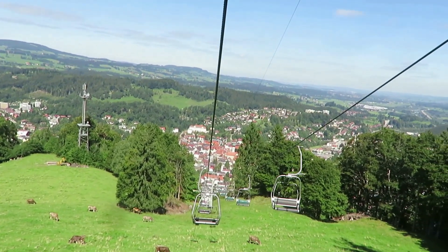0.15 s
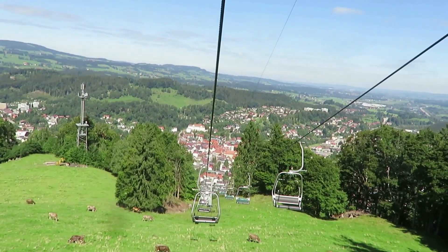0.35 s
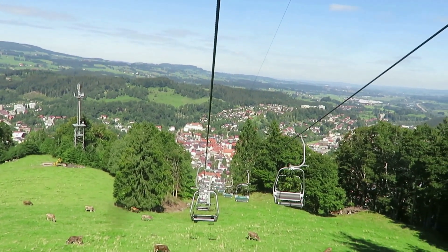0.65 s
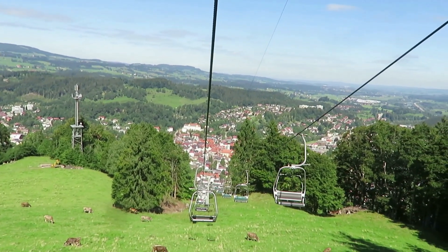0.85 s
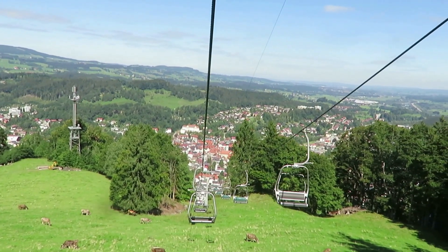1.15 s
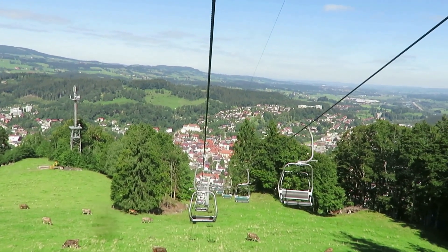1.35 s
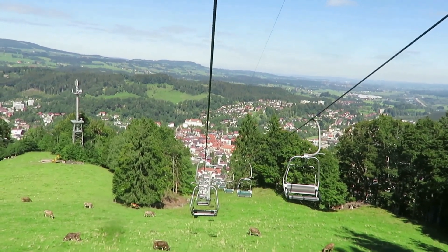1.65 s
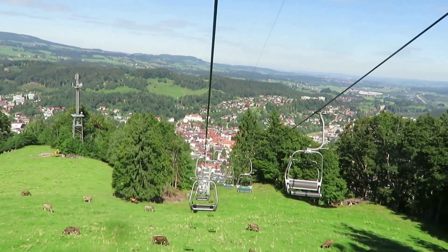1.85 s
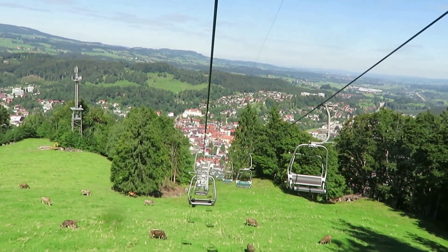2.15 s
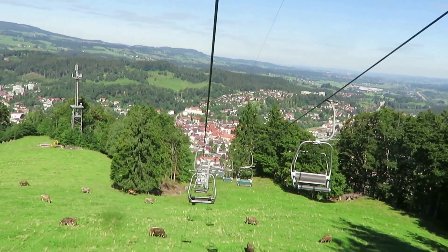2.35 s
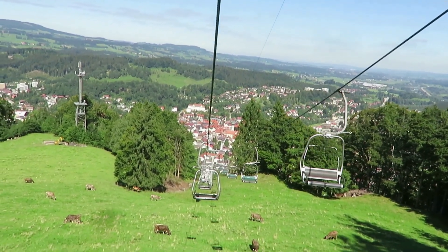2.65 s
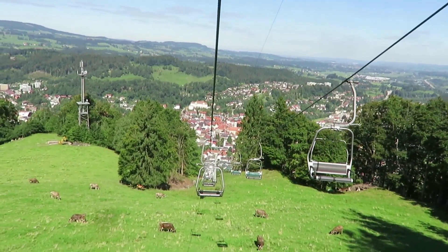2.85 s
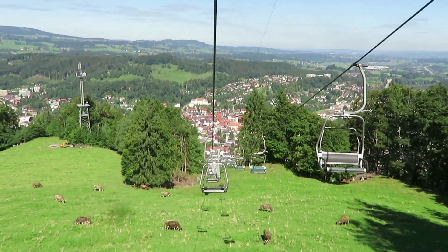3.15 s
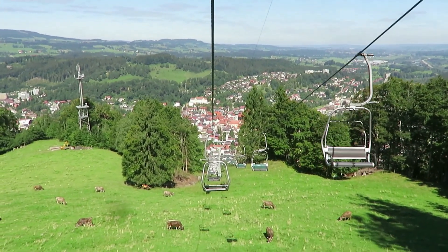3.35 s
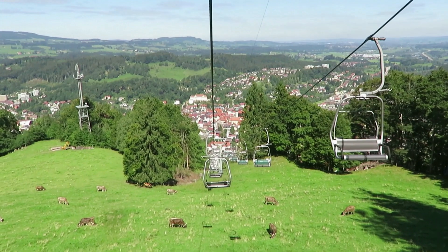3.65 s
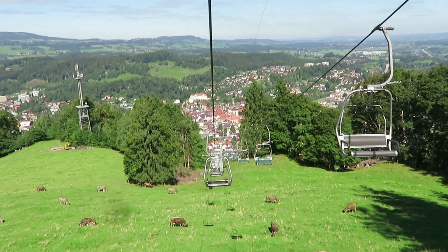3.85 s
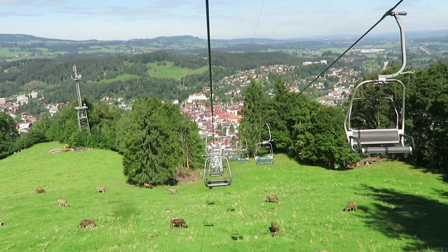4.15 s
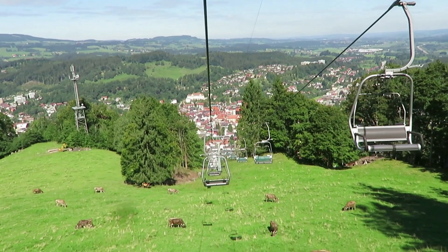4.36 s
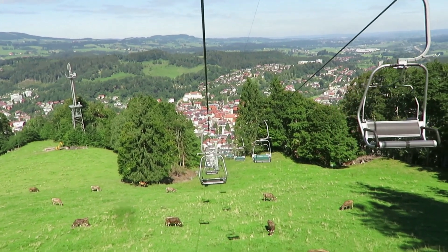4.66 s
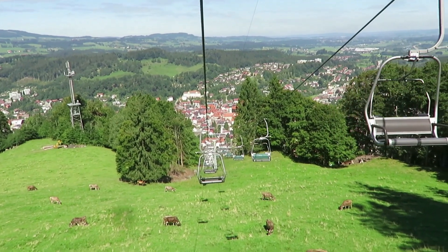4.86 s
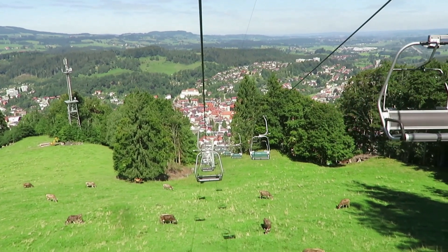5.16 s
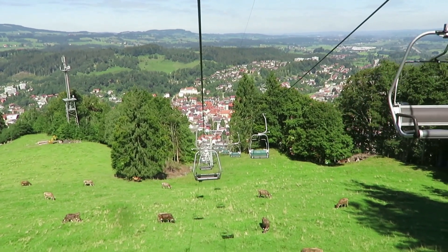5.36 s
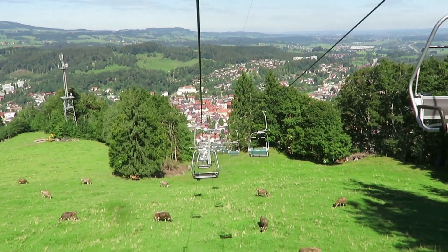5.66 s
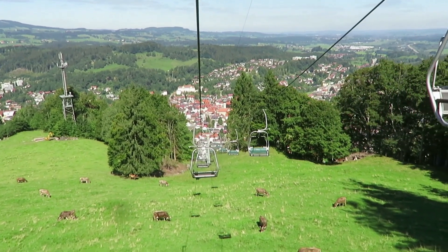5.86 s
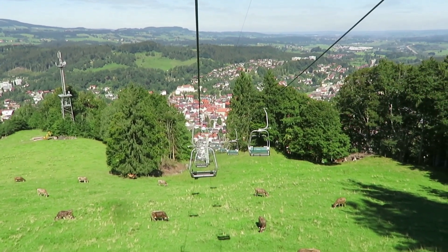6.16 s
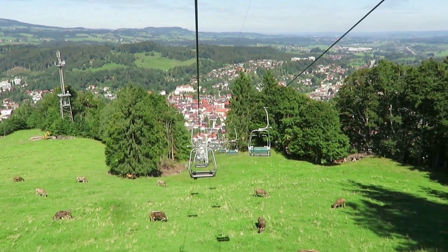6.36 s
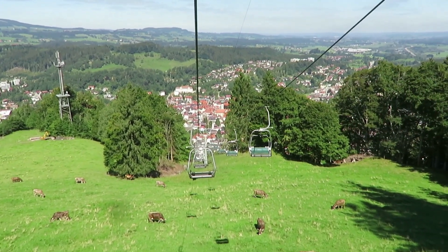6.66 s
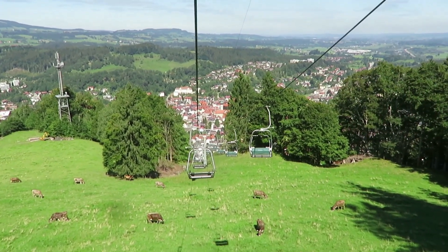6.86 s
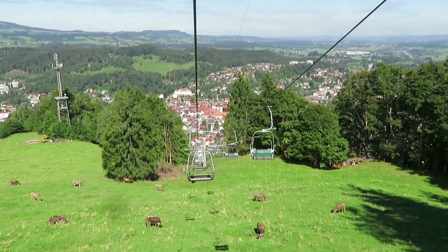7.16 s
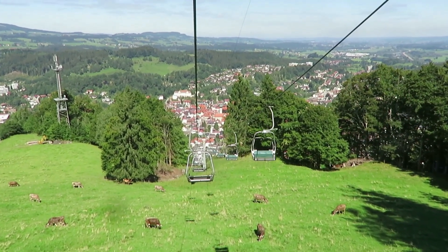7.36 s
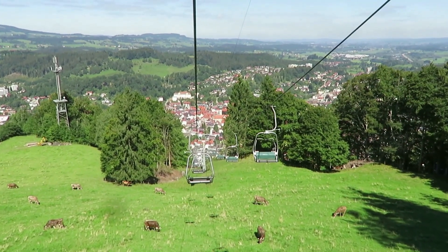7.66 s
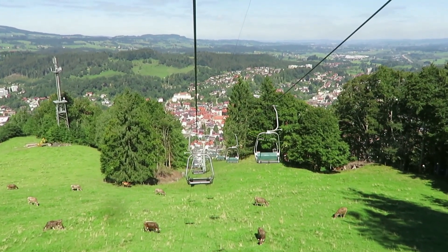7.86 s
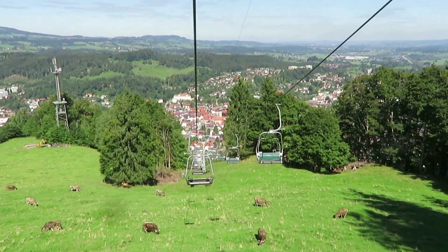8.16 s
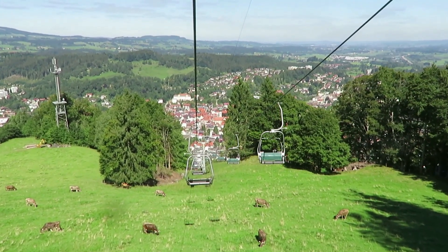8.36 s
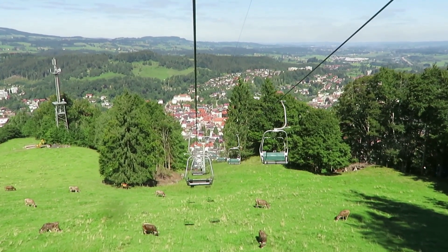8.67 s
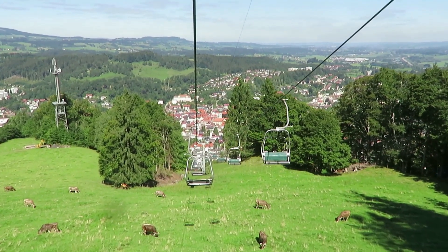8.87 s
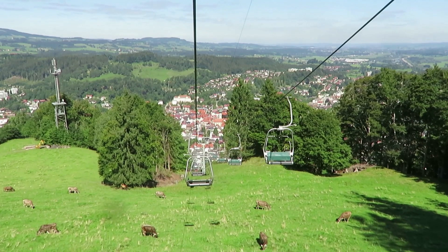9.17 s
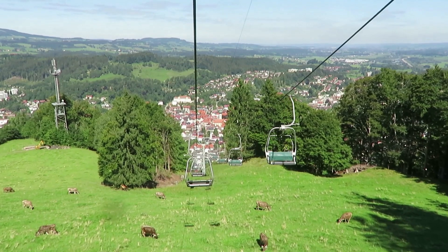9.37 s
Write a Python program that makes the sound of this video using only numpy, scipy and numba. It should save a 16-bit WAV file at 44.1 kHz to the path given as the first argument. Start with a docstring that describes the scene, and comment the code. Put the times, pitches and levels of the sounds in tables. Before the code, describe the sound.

A grazing herd's metal bells clatter in dense, irregular overlap, hollow clonks among bright rings, with distant tinkling and muffled wind buffeting.

```python
"""From the start, cattle graze on a mountain pasture, their bells clanking and jangling together.
Each near bell is a sum of damped modes set off at tabled times; a low air mode adds a hollow clonk.
Randomly struck bells tinkle further off over a noise haze, and a noise tail echoes from the forest edge.
Gusts of coloured noise rumble on the microphone, first briefly; a faint low drone fades throughout.
A tick of damped sines comes at 2.33 s, the longest gust at 4.6 s and shorter ones follow to the end."""
import sys
import numpy as np
from scipy import signal
from scipy.fft import rfft, irfft
from scipy.io import wavfile
from numba import njit

SR = 44100
rng = np.random.default_rng(int(sys.argv[2]) if len(sys.argv) > 2 else 0)


def materialize(psi):
    """Save the field psi as 16-bit PCM at rate SR to the path in sys.argv[1].

    A 1-D psi becomes a single channel; in a 2-D psi each row is a channel.
    """
    bounded = np.clip(np.atleast_2d(psi).T, -1, 1)
    quanta = np.round(bounded * 32767).astype(np.int16)
    wavfile.write(sys.argv[1], SR, quanta)


N = 419832

# vibration modes of each near bell: pitch_hz, level_db, t60_s
LEAD_MODES = [(380, -10, 0.3), (1308, -29.5, 0.88), (1836, -25, 0.71), (1955, -30.5, 0.95),
              (2330, -23.5, 0.25), (2408, -31, 2), (2476, -28.5, 0.5), (2780, -28, 0.34),
              (2843, -20.5, 0.41), (2995, -25, 0.45), (3170, -20.5, 0.13), (3290, -33, 1.5),
              (3360, -19, 0.11), (3446, -21, 0.13), (3560, -56, 1.4), (3750, -30, 0.29), (3900, -26, 0.42),
              (3895, -31.5, 0.43), (3840, -35, 1.4), (3910, -41, 1.9), (4120, -35, 0.23), (3960, -39, 1.7),
              (4600, -28, 0.39), (4750, -36, 0.5), (4480, -49, 1.61), (4830, -33, 0.32), (5260, -35, 0.61),
              (5460, -39, 0.27), (5440, -47, 0.1), (6540, -48, 0.33)]
DEEP_MODES = [(433.5, -15, 0.44), (1212, -23, 0.79), (1896, -33.5, 2.5), (1963, -25, 0.51),
              (2116, -33.5, 2.3), (2690, -19.5, 0.23), (2970, -27.5, 0.83), (3010, -36, 0.96),
              (3620, -36, 0.56), (3600, -47, 1.51), (3870, -27.5, 0.12), (4100, -27, 0.4),
              (4330, -38, 1.94), (4316, -42, 2.1), (4520, -34.5, 0.43), (4800, -32, 0.11),
              (4800, -25.5, 0.16), (4800, -40, 0.53), (5200, -45, 0.78), (5320, -36, 0.18),
              (5630, -45, 0.5), (5800, -31, 0.66), (6070, -41, 0.54), (6270, -46, 0.58), (6200, -42, 0.25)]
CLEAR_MODES = [(442.4, -19.5, 0.35), (1239, -26, 0.53), (1976, -23, 0.75), (2365, -32.5, 4.2),
               (2725, -27.5, 0.57), (2946, -20, 1.05), (3436, -36, 2.7), (3600, -38, 0.18),
               (3900, -24.5, 0.29), (4080, -44, 0.29), (4200, -30, 0.19), (4220, -19, 0.26),
               (4200, -44, 1.9), (4530, -42, 0.32), (4530, -28, 0.18), (4600, -43, 0.19), (4950, -29, 0.18),
               (5220, -33, 0.3), (6100, -31, 0.14), (6400, -30, 0.074)]
SHARP_MODES = [(810, -39, 1.5), (1340, -44, 7.1), (1502, -42, 5.6), (1806, -40.5, 2.9), (1880, -33, 0.91),
               (2420, -36.5, 6.3), (2700, -46, 1.8), (2844, -23, 0.41), (3060, -28.5, 0.85),
               (3180, -37, 3.2), (3440, -29, 0.54), (3465, -25.5, 0.29), (3850, -41, 0.58),
               (3770, -45, 0.25), (4300, -22, 0.21), (4850, -38.5, 0.37)]
BIG_MODES = [(316.3, -24.5, 0.76), (828, -41, 2.5), (1514, -33.5, 1.5), (2000, -44, 2.8), (2240, -44, 0.51),
             (2310, -29, 1.4), (3140, -30, 0.34), (3270, -27.5, 0.26), (3343, -19, 0.39), (3780, -30, 1.3),
             (3970, -31, 0.86), (4080, -26.5, 0.49), (4150, -26.5, 0.38), (4320, -34, 0.74),
             (4800, -31.5, 0.29), (5210, -41, 1.6)]
TINNY_MODES = [(446, -27, 0.6), (1967, -34, 2), (3200, -40, 0.6), (3330, -45, 2.1), (3700, -50, 1.8),
               (3750, -33, 0.57), (4280, -41, 0.45), (4320, -30, 0.55), (4210, -35, 0.26), (4430, -31, 0.3),
               (4560, -27, 0.12), (5270, -24.5, 0.2), (5810, -40, 0.37), (5880, -32, 0.28),
               (7970, -40.5, 0.45)]
DRY_MODES = [(832, -25.5, 0.29), (1952, -35, 2.8), (2172, -34, 0.66), (2320, -40, 0.12), (2386, -38, 2.6),
             (2530, -35, 2.3), (3080, -45, 0.51), (3200, -35, 0.57), (3490, -39.5, 1.1), (3690, -42, 1.8),
             (4000, -44, 2.5), (4700, -32, 0.23), (5080, -53, 0.4), (6380, -27.5, 0.1), (6560, -41, 0.15),
             (8230, -40, 0.4)]
BRIGHT_MODES = [(461, -27.0, 0.46), (1417, -34.5, 10.4), (1461, -43.5, 22), (1678, -41, 9.5),
                (2099, -39.5, 7.6), (2510, -25.5, 1.2), (2640, -32, 0.19), (2850, -27, 0.55),
                (3325, -36, 1.8), (3380, -34, 0.62), (3550, -32, 1.15), (4040, -40, 0.5), (4315, -22, 0.68),
                (4460, -33, 0.29), (6420, -23, 0.16)]
DULL_MODES = [(486, -23, 0.35), (1228, -35, 2.84), (2060, -39.5, 1.3), (2125, -40.5, 5), (2224, -36, 1.1),
              (2780, -45, 0.52), (2990, -42, 0.89), (3350, -63, 1.65), (3460, -59, 0.78), (3700, -38, 0.4),
              (3720, -32.5, 0.28), (3840, -39, 0.38), (4150, -46, 1.1), (4210, -48, 0.74),
              (4500, -35, 0.48), (5000, -55, 1.51)]
LOW_AIR_MODES = [(307.6, -25, 0.27), (458, -47, 0.12), (1535, -36.5, 0.77), (1910, -34, 1.9),
                 (2090, -44, 0.42), (2580, -34.5, 0.5), (2745, -44, 1.5), (3004, -39.5, 2.4),
                 (3200, -40, 2.1), (3250, -30, 0.92), (3330, -47, 0.27), (3620, -26.5, 0.52),
                 (3760, -36.5, 0.5), (3880, -37, 0.66), (4721, -54, 0.21), (5450, -35, 0.23),
                 (5400, -57, 0.35), (7000, -46, 0.11), (8500, -40, 0.29)]
SILVERY_MODES = [(656.3, -40.5, 13.7), (1443, -29, 3.2), (1695, -33, 7.8), (1970, -30, 1.4),
                 (2086, -42, 9.1), (2395, -26.5, 4.1), (2550, -28, 0.71), (3170, -33, 3.4),
                 (3290, -29, 0.79), (3684, -21.5, 2.5), (4490, -23, 0.42), (5190, -23, 0.84),
                 (5010, -20, 0.53), (5500, -23, 0.29), (5828, -24, 0.2), (6060, -40, 0.31),
                 (6540, -29, 0.33)]
SINGING_MODES = [(1207, -25, 2.14), (1945, -37, 11), (2300, -46, 9.7), (2324, -35.5, 5.9), (2397, -30, 3.9),
                 (2410, -33.5, 0.64), (2490, -34, 0.63), (2535, -26, 2.9), (2580, -34, 0.14),
                 (2750, -26, 0.12), (2780, -39.5, 1.7), (2910, -35, 0.24), (3340, -39, 2.76),
                 (4030, -38, 1.9), (4330, -52, 1.7), (4450, -39, 1.3)]
MELLOW_MODES = [(845, -39, 6.2), (1441.5, -34, 6.1), (2090, -29, 0.13), (2110, -36, 1.8), (2142, -33, 1.8),
                (2410, -49, 1.6), (2460, -44, 1.8), (2540, -33, 2.2), (2554, -42, 5), (3080, -43, 0.86),
                (3260, -37, 0.85), (3610, -40.5, 2.6), (4140, -34, 0.73), (4612, -39, 0.53),
                (5280, -37, 0.32), (6270, -40.5, 0.29)]
THIN_MODES = [(809, -41, 0.87), (1250, -35, 0.82), (2382, -30.5, 1.1), (2545, -42, 2.9), (2700, -41, 0.3),
              (2950, -45, 1.6), (2970, -39, 1.2), (3190, -41, 1), (3694, -31, 1.4), (3910, -42.5, 1.8),
              (4580, -24, 0.064), (4790, -40, 0.84)]
HARD_MODES = [(353.7, -25, 0.4), (2200, -20, 0.45), (2830, -39, 0.28), (3160, -15, 0.088), (3110, -19, 0.2),
              (3310, -19.5, 0.22), (3580, -20, 0.17), (4360, -19, 0.072), (5870, -39, 0.066)]
HOLLOW_MODES = [(943, -27.5, 0.32), (1880, -38, 0.4), (2800, -40, 0.3)]
# blows on the most prominent bells, with own colour:
# start_s, force_db, own_brightness_db_per_octave, air_clonk_db
LEAD_HITS = [(0.609, -9, -1.2, 0), (1.873, 0, 1.3, -1), (2.507, -6.5, 1.5, -4), (3.133, -5.5, 2.5, 0.5),
             (3.508, -11, 2, -7), (3.802, -9.5, 4, 1), (4.553, -9, 3.5, 0.5), (5.255, -3.5, 2, 0.5),
             (5.537, -11, 0.5, 0.5), (5.995, -3.5, 0, -0.5), (6.071, -13, -1, 1), (6.318, -4.5, -0.5, -2),
             (7.361, -18.0, 0.2, 3), (9.007, -14.5, 3, -2)]
DEEP_HITS = [(0.347, -7.5, 4.5, -2.5), (1.208, -11.5, 1.5, 4), (1.757, -14.0, 3.5, 2), (2.459, -14, 3.5, 3),
             (2.611, -6.5, -0.2, 5.5), (3.394, -5.5, 0.7, -4), (3.803, -7.5, 0, -0.5),
             (4.276, -0.5, -0.5, 1.5), (4.398, -12, 2.3, 8), (4.79, -6.5, 2.3, 3.5), (5.236, -7, 2.5, 1),
             (6.293, -8.5, 0.5, 2), (6.854, -8.5, -3, 2.5), (6.959, -12.5, -1, -10), (7.585, -12.5, 1.5, 0)]
CLEAR_HITS = [(0.164, -6.5, -0.3, -7), (0.645, -9, 0.5, 0.5), (0.961, -15.5, 3, -2), (1.087, -1, -0.5, 0),
              (1.299, -11.5, 0, -1), (2.156, -12.5, 1.3, 8), (3.307, -11.5, -2, 2),
              (3.555, -10.5, 0.1, -12), (3.861, -14, 6, 2), (4.174, -14.5, 1.2, -2), (4.739, -8.5, 0.9, 4),
              (4.98, -13, -1.5, -16), (5.025, -11, -1.5, -1), (5.392, -2.5, -2, 0.5),
              (5.836, -13.5, -12, 8), (6.683, -7, 1.5, 4), (7.306, -11.5, -1, 8), (7.636, -18, 0.1, 8),
              (7.761, -12, 3, 8.5), (8.819, -8.5, 0.5, 6.5), (9.482, -14, -3, 7)]
BIG_HITS = [(1.394, -0.5, -2, -5), (1.641, -8, 0, 0.5), (2.122, -9.5, -0.5, -5.5), (2.697, -10.5, -4, 5),
            (2.975, -10, -6, 3.5), (3.302, -7.5, 0, 0), (3.76, -8.5, 5, 8), (4.322, -5.5, 3.5, 2.5),
            (6.617, -9, 2, 3.5), (7.037, -12.5, -6, -4), (7.363, -12.5, 1.5, 0), (8.03, -7, 1.5, 0.5),
            (9.008, -10, 4, -2)]
# onsets of the remaining near bells: start_s, force_db
SHARP_HITS = [(1.539, -2.5), (2.23, -17), (2.66, -13), (2.981, 1), (3.277, -2.5), (3.62, -8), (4.669, -8.5),
              (5.995, -3.5), (8.145, -6), (8.819, -12), (9.265, -4)]
TINNY_HITS = [(1.259, -9), (2.378, -14), (3.173, -8), (3.616, -1), (4.483, -6), (4.861, -4), (5.24, -3.5),
              (5.783, -2), (6.159, -8), (6.518, -5.5), (6.574, -12), (6.975, -6.5), (7.525, -13.5),
              (7.808, -10), (8.117, -1), (9.295, -3.5)]
DRY_HITS = [(0.395, -11), (1.356, -13), (2.419, -9), (3.083, -11), (3.369, -8), (4.224, -6.5), (4.329, -16),
            (4.551, -3), (4.822, 1), (5.183, -1), (5.51, -1.5), (6.426, -10), (7.325, -2), (7.859, -12),
            (7.93, -36), (8.289, -10), (9.438, -10)]
BRIGHT_HITS = [(0.818, -6.5), (1.031, -15.5), (1.518, -8), (2.099, 0), (2.508, -4.5), (2.903, -9.5),
               (3.246, -10.5), (3.621, -14), (4.933, -14), (5.392, -8), (9.214, -9.5), (9.375, -4)]
DULL_HITS = [(0.263, -1), (1.211, -4.5), (1.519, 1), (2.0, -1), (2.504, -4.5), (3.717, -5), (5.35, 1),
             (5.647, -7), (6.21, 1), (6.476, -1.5), (6.76, -6), (7.18, -6), (7.279, -5), (7.683, -4.5),
             (8.625, -9.5)]
LOW_AIR_HITS = [(1.822, -0.5), (2.325, -9), (3.019, -20), (4.458, -6), (5.184, -3), (5.578, -8.5),
                (5.959, -16), (6.109, -6), (6.379, -8), (7.638, -6), (8.474, 0), (8.514, 0), (8.577, -13),
                (8.999, -7.5), (9.147, -7.5)]
SILVERY_HITS = [(0.2, -15), (1.688, -12), (2.039, -2.5), (2.506, -15), (3.619, -16.5), (5.582, -11.5),
                (5.692, -26), (5.883, -9.5), (7.422, -14)]
SINGING_HITS = [(2.61, -3.5), (3.394, -10), (4.276, -11.5), (5.84, -8), (6.86, -15), (7.44, -11.5),
                (8.289, -9.5), (8.887, 1.5), (9.372, -4)]
MELLOW_HITS = [(2.0, -3.5), (2.631, -46), (3.369, -1.5), (3.664, 1), (4.001, 1.5), (5.473, -6),
               (7.966, -6.5), (8.757, -12)]
HARD_HITS = [(2.78, -15), (4.322, -9), (5.261, -14), (7.085, -8.5)]
HOLLOW_HITS = [(1.101, -8), (1.83, -7), (3.36, -7), (4.2, -7), (4.97, -12), (5.961, -5), (6.31, -2),
               (7.65, -0.5), (7.961, -1.5), (8.5, -4.5), (8.821, -10)]
# onsets of a bell already ringing at the start (first row, 0.0 s): start_s, force_db
THIN_HITS = [(0.0, 1), (0.112, 0), (0.444, 1), (0.612, -5), (1.157, -15), (1.588, -3), (2.729, -9),
             (6.617, -5.5), (7.966, -6.5)]
# label of the low-air bell in the list below; it says nothing of the bell's size
SMALL_MODES, SMALL_HITS = LOW_AIR_MODES, LOW_AIR_HITS
# the near bells: modes, hits, ring_db, clash_db
BELLS = [(LEAD_MODES, LEAD_HITS, 0.24, -23), (DEEP_MODES, DEEP_HITS, 0.42, -25),
         (CLEAR_MODES, CLEAR_HITS, 0.37, -28.5), (SHARP_MODES, SHARP_HITS, 0.26, -32),
         (BIG_MODES, BIG_HITS, 0.81, -24.5), (TINNY_MODES, TINNY_HITS, 0.25, -29),
         (DRY_MODES, DRY_HITS, .3, -28.5), (BRIGHT_MODES, BRIGHT_HITS, 0.23, -28.5),
         (DULL_MODES, DULL_HITS, 0.28, -38), (SMALL_MODES, SMALL_HITS, 0.2, -30.5),
         (SILVERY_MODES, SILVERY_HITS, 0.2, -18), (SINGING_MODES, SINGING_HITS, 0.27, -27.5),
         (MELLOW_MODES, MELLOW_HITS, .3, -30.5), (THIN_MODES, THIN_HITS, 0.34, -37),
         (HARD_MODES, HARD_HITS, 0.34, -26), (HOLLOW_MODES, HOLLOW_HITS, .3, -37)]
# strength of the crowded short partials that make the clash: pitch_hz, relative_level_db
CLASH = [(1200, -7), (2000, -7), (3000, -6), (4500, 1.5), (6500, -3), (9000, -9.5), (13000, -20),
         (15000, -38)]
# width heard by the two microphone ports: pitch_hz, side_minus_mid_db
PORTS = [(300, -77), (1200, -37), (1900, -18.5), (2300, -9), (3200, -6.5), (5000, -6.5), (6300, -0.5),
         (8000, 3), (12000, 11)]
# loudness of the far herd and haze over time: time_s, relative_level_db
HERD = [(0.0, -25), (1.04, -27.5), (1.99, -24.5), (4.2, -27), (5.14, -29), (5.4, -25), (7.0, -26),
        (7.25, -31.5), (7.4, -27.5), (8.75, -29.5), (9.52, -24.5)]
# a sharp tick close to the microphone and its rebound: start_s, level_db, pitch_hz, t60_s
TICK = [(2.3304, -1, 3140, 0.00092), (2.331, -15, 1040, 0.013), (2.333, -8, 760, 0.0029)]
# spectrum of the farthest bells: pitch_hz, relative_level_db_per_hz
WASH = [(250, 0), (430, 15), (600, -4.5), (900, 4.5), (1100, 1.5), (1600, 0.5), (2100, 2.5), (3200, -7),
        (4500, -0.5), (6500, -12.5), (9000, -22.5), (13000, -49), (16000, -64)]
# gusts on the microphone: start_s, hold_s, relative_level_db
GUSTS = [(0.42, 0.053, -41.5), (1.234, 0.051, -33.5), (1.616, 0.11, -41.5), (3.976, 0.042, -34.5),
         (4.554, 1.95, -31.5), (5.82, 0.22, -28.5), (7.205, 0.3, -29), (7.84, 0.31, -34),
         (8.664, 0.23, -36)]
# spectrum of the wind: pitch_hz, relative_level_db_per_hz
WIND = [(20, -31), (40, -15.5), (70, -5), (130, -0.5), (220, -1), (330, -5.5), (450, -7.5), (600, -33.5),
        (1000, -44), (2500, -68)]

TOP_HZ = 15700
AIR_TOP_HZ = 600  # modes below this belong to the air inside the bell
REBOUND_S, REBOUND_DB = 0.022, -8.5  # mean delay and level of the clapper's bounce
# blow-to-blow spread: partial level (dB), air pitch (share), air glide (share per s)
SPOT_SCATTER_DB, AIR_DETUNE, AIR_GLIDE_PER_S = 1.2, 0.008, 0.08
AIR_SAG, AIR_SAG_S = 0.059, 0.064  # share by which the air's pitch sinks, and its time constant
BRIGHTER_PER_DB, BRIGHT_SCATTER_DB = 0.0525, 0.77  # dB per octave: with force, and at random
GUST_RISE_S, GUST_FALL_S = 0.17, 0.25  # time constants
BREEZE_DB = -52  # steady breeze, on the scale of the gust levels


def near_bells():
    """Impulsive excitation: tosses of the head throw the clapper against the wall of a near bell."""
    out = np.zeros((2, N))
    for modes, hits, ring_db, clash_db in BELLS:
        bell = make_bell(modes, clash_db - ring_db)
        longest_t60_s = np.max(bell[2])
        for start_s, force_db, *colour in hits:
            own_tilt_db, air_db = colour or (0, 0)
            # harder blows are brighter, and no two land alike
            tilt_db = own_tilt_db + BRIGHTER_PER_DB * force_db
            tilt_db += BRIGHT_SCATTER_DB * rng.standard_normal()
            add(out, start_s, strike(bell, force_db + ring_db, tilt_db, longest_t60_s, air_db))
    return out


def make_bell(modes, clash_db, clash_t60_s=0.2, lean=0.88, count=56):
    """Modal density: main modes plus crowded, fast-dying wall modes (Hz, strength, t60, side share)."""
    crowd_hz = np.geomspace(CLASH[0][0], CLASH[-1][0], count)
    crowd_hz = crowd_hz * np.exp(.03 * rng.standard_normal(count))
    crowd = undb(at_hz(CLASH, crowd_hz) + 5.0 * rng.standard_normal(count)) * np.sqrt(crowd_hz)
    crowd *= undb(clash_db) * np.sqrt(2 / np.sum(crowd ** 2))
    crowd_t60 = clash_t60_s * (3000 / crowd_hz) ** .2

    main_hz, main_db, main_t60 = np.transpose(modes)
    hz = np.r_[main_hz, crowd_hz]
    size = np.r_[undb(main_db), crowd]
    t60 = np.r_[np.maximum(main_t60, .05), crowd_t60]
    # each partial reaches the two ports about equally loud, but shifted in phase
    tilt, sign = rng.standard_normal((2, len(hz)))
    side = undb(at_hz(PORTS, hz)) * np.sign(sign) * 1j * np.exp(1j * lean * tilt)
    return hz, size, t60, side


def strike(bell, force_db, bright_db, seconds, air_db, detune=0.000411, chatter_s=0.0086,
           first_share=0.72):
    """Modal excitation: the spot a blow lands on sets the strength and phase of every partial."""
    hz, size, t60, side = bell
    spot, drift = rng.standard_normal((2, len(hz)))
    air = hz < AIR_TOP_HZ
    octaves = np.log2(np.minimum(hz, 8000) / 2500) * (hz > AIR_TOP_HZ)
    phase = np.exp(2j * np.pi * rng.random(len(hz)))
    size = size * undb(force_db + bright_db * octaves + SPOT_SCATTER_DB * spot) * phase
    # one complex factor per sample turns each partial and lets it decay
    poles = np.exp((2j * np.pi * hz * (1 + detune * drift) - np.log(1000) / t60) / SR)
    left, right = size * (1 + side), size * (1 - side)
    ring = partials(poles[~air], left[~air], right[~air], int(max(seconds, 1) * SR))

    # the clapper rebounds and sets the short, high partials going again
    short = (hz > 3000) & (t60 < .3)
    lag = int(REBOUND_S * (.5 + rng.random()) * SR)
    rebound = partials(poles[short], left[short], right[short], SR // 2)
    rebound *= np.minimum(np.arange(SR // 2) / 30, 1)  # short fade-in
    ring[:, lag:lag + SR // 2] += undb(REBOUND_DB) * rebound

    # chatter on the wall feeds the ring for some milliseconds after the first contact
    t = np.arange(SR // 20) / SR
    ring[:, :len(t)] *= 1 - (1 - first_share) * np.exp(-t / chatter_s)
    # the contact itself lasts about a millisecond
    ring[:, :len(t)] *= 1 - np.exp(-(t / .001) ** 2)
    for air_mode in zip(hz[air], abs(size[air]) * undb(air_db), t60[air]):
        add(ring, 0, clonk(*air_mode)[None])
    return ring


def clonk(hz, size, t60, swell_s=0.0043):
    """Cavity resonance: the air swells in a few cycles, its pitch moved by the mouth nearing the neck."""
    t = np.arange(int(.7 * SR)) / SR
    offset, glide = rng.standard_normal(2)
    sag = AIR_SAG * (np.exp(-t / AIR_SAG_S) - .6)
    pitch_hz = hz * (1 + sag + AIR_DETUNE * offset + AIR_GLIDE_PER_S * glide * t)
    envelope = undb(-60 * t / t60) * (1 - np.exp(-t / swell_s))
    return size * envelope * np.sin(2 * np.pi * np.cumsum(pitch_hz) / SR)


@njit
def partials(poles, left, right, size):
    """Superposition: a sum of decaying sines, each with its complex strength at the two ports."""
    out = np.zeros((2, size))
    for k in range(len(poles)):
        z, p = 1 + 0j, poles[k]
        # stop once the amplitude has fallen to exp(-6)
        for i in range(min(size, int(-6 / np.log(abs(p))))):
            out[0, i] += (z * left[k]).imag
            out[1, i] += (z * right[k]).imag
            z *= p
    return out


def far_bells(muted_hum_db=-10, herd_db=-7, clash_db=-30, size_spread=.035, force_spread_db=2.5,
              bright_db=-1.0, longest_t60_s=0.36, far_air_db=-1, count=11):
    """Scaling and damping: size shifts all modes together, and the neck shortens and mutes the ring."""
    out = np.zeros((2, N))
    for modes, *_ in BELLS:
        hz, db, t60 = np.transpose(modes)
        db = db + muted_hum_db * ((hz > 600) & (hz < 1350))  # the neck mutes the hum note most
        scaled_hz = hz * (1 + size_spread * rng.standard_normal())
        bell = make_bell(np.c_[scaled_hz, db, np.minimum(t60, longest_t60_s)], clash_db)
        even_db = -10 * np.log10(np.sum(bell[1] ** 2 * np.sqrt(bell[2])))  # evens out the bells
        # one blow at a random moment in each of count equal time slots
        for start_s in (np.arange(count) + rng.random(count)) * N / SR / count:
            force_db = even_db + force_spread_db * rng.uniform(-1.6, 1)
            add(out, start_s, strike(bell, force_db, bright_db, 1, far_air_db))
    return out / out.std() * undb(herd_db + curve(HERD, np.arange(N) / SR))


def forest_echo(x, wet_db=-15, t60_s=0.88, delay_s=0.031):
    """Diffuse scattering: trunks and slope spread the bells into a soft, decaying noise tail."""
    t = np.arange(SR) / SR
    onset = 1 - np.exp(-(t / delay_s) ** 2)
    tail = rng.standard_normal(SR) * undb(-60 * t / t60_s) * onset
    tail = tail / np.linalg.norm(tail)
    return undb(wet_db) * signal.fftconvolve(x, tail[None], axes=1)[:, :N]


def tick():
    """Damped oscillation: a small hard contact rings as short sines that die within milliseconds."""
    out, t = np.zeros((2, N)), np.arange(SR // 20) / SR
    for start_s, db, hz, t60 in TICK:
        sine = undb(db - 60 * t / t60) * np.sin(2 * np.pi * hz * t)
        add(out, start_s, sine[None])
    return out


def wash(wash_db=-11):
    """Incoherent summation: the farthest bells blur into a noise haze, wider in the treble."""
    hz = np.arange(N // 2 + 1) * SR / N
    side = irfft(rfft(noise(WASH)) * undb(at_hz(PORTS, hz)), N)
    level = undb(wash_db + curve(HERD, np.arange(N) / SR))
    return (noise(WASH) + np.array([side, -side])) * level


def wind(wind_db=2.2, flutter_db=3.0, side_db=-20, drone_db=-42, drone_fade_db_per_s=3.0):
    """Turbulent pressure: eddies make gusts on the housing flutter; a faint low drone fades beneath."""
    eddies = noise([(1, 0), (25, 0), (60, -30), (150, -80)])
    side = undb(side_db) * noise([(30, -16), (70, -24), (150, 5.5), (400, 18.5), (700, -5.0), (2500, -11)])
    gusts = wind_strength() * undb(wind_db + flutter_db * eddies)
    drone = noise([(40, -47), (95, -2), (140, 8.5), (190, -12), (600, -44), (2000, -80)])
    drone = drone * undb(drone_db - drone_fade_db_per_s * np.arange(N) / SR)
    return (noise(WIND) + np.array([side, -side])) * gusts + drone


def wind_strength():
    """Power addition: each gust builds, holds and dies away, its power added to the breeze."""
    t = np.arange(N) / SR
    power = undb(BREEZE_DB) ** 2
    for start_s, hold_s, db in GUSTS:
        rise = np.maximum(start_s - t, 0) / GUST_RISE_S
        fall = np.maximum(t - start_s - hold_s, 0) / GUST_FALL_S
        power = power + (undb(db) * np.exp(-rise - fall)) ** 2
    return np.sqrt(power)


def noise(spectrum):
    """Spectral shaping: white noise filtered to the given spectrum, at rms 1."""
    hz = np.arange(N // 2 + 1) * SR / N
    x = irfft(rfft(rng.standard_normal(N)) * undb(at_hz(spectrum, hz)), N)
    return x / x.std()


def undb(db):
    """Decibel law: amplitude ratio of a level in dB."""
    return 10 ** (np.asarray(db) / 20)


def curve(rows, t):
    """Linear interpolation of (s, value) rows at the times t."""
    return np.interp(t, *np.transpose(rows))


def at_hz(rows, hz):
    """Interpolation of (Hz, value) rows on a logarithmic frequency axis."""
    f, value = np.transpose(rows)
    return np.interp(np.log(np.maximum(hz, 1)), np.log(f), value)


def add(out, start_s, sound):
    """Linear superposition: mix a sound in at start_s seconds."""
    i = int(np.clip(start_s * SR, 0, N - 1))
    out[:, i:i + sound.shape[1]] += sound[:, :N - i]


def scene():
    """Superposition of the herd and its echo with haze, wind and a tick at the microphone."""
    bells = near_bells() + far_bells()
    return bells + forest_echo(bells) + tick() + wash() + wind()


def record(dry):
    """Band limitation: a steep elliptic low-pass removes the top of the treble."""
    lowpass = signal.ellip(8, .2, 70, TOP_HZ, fs=SR, output="sos")
    return signal.sosfilt(lowpass, dry)


dry = scene()
out = record(dry)
materialize(out)
```